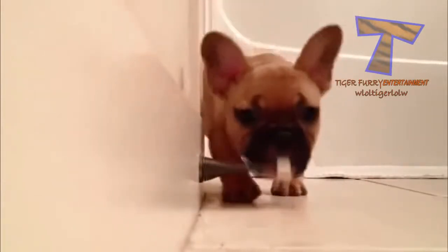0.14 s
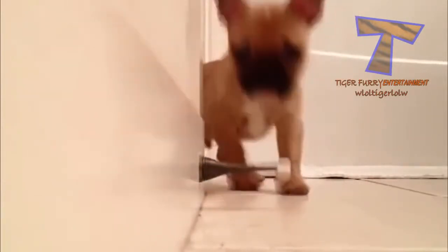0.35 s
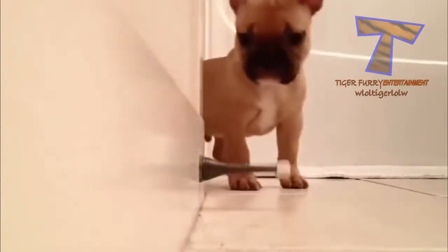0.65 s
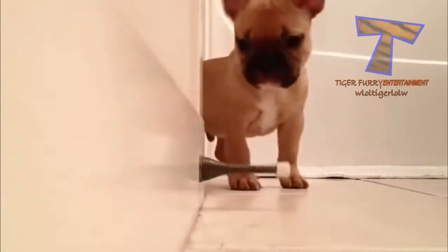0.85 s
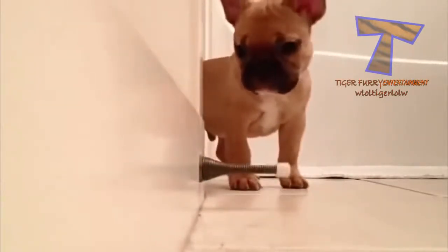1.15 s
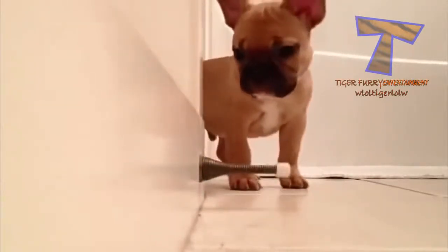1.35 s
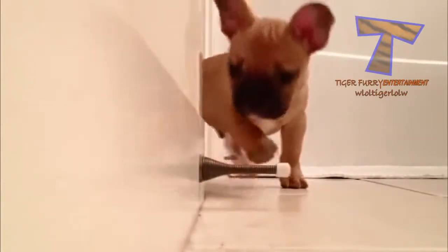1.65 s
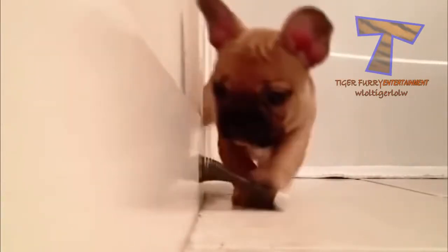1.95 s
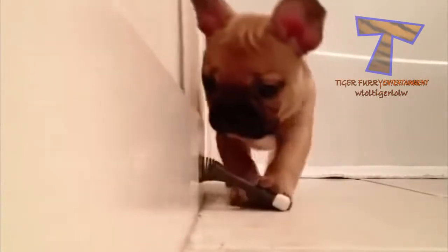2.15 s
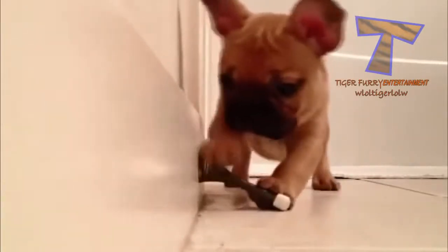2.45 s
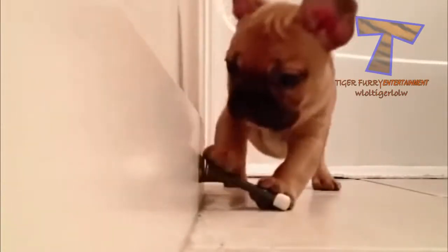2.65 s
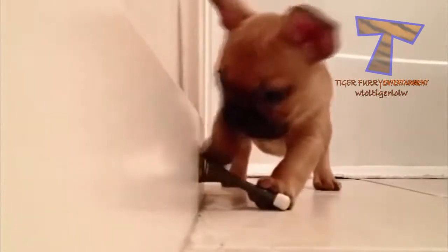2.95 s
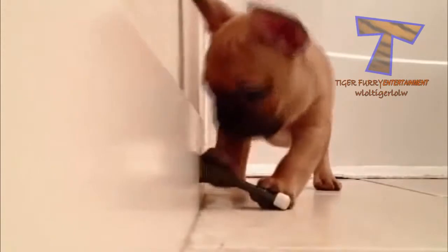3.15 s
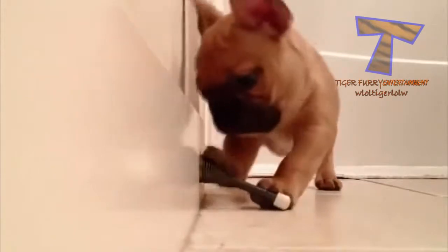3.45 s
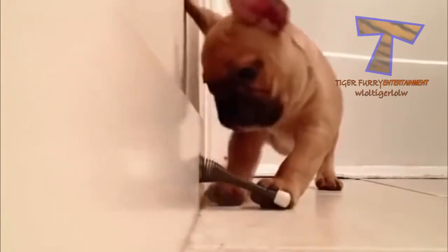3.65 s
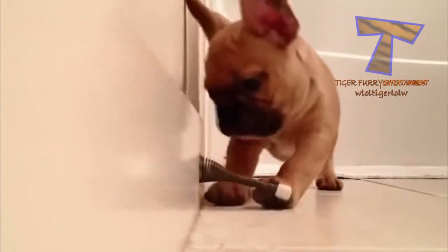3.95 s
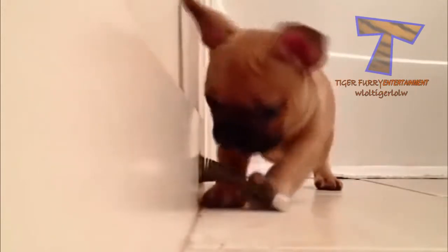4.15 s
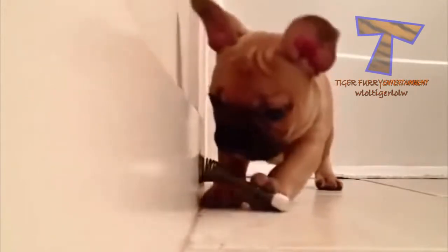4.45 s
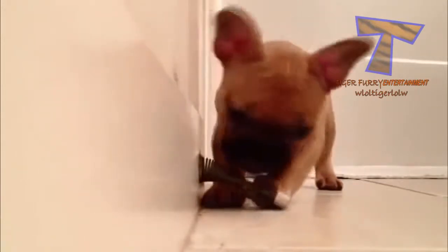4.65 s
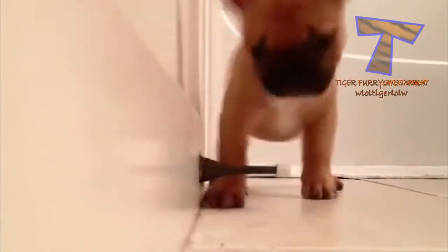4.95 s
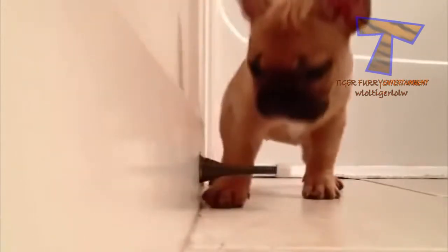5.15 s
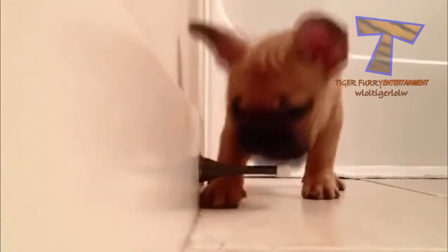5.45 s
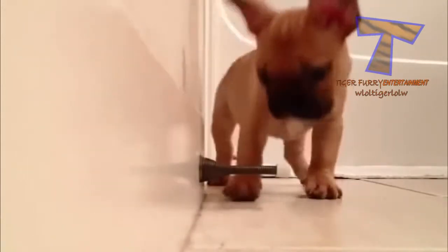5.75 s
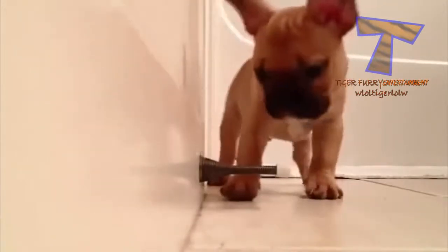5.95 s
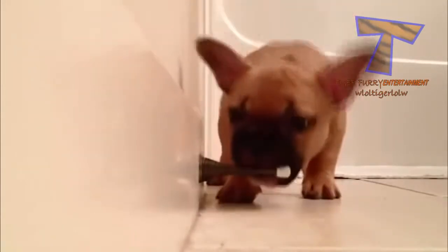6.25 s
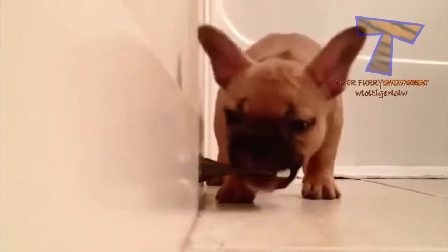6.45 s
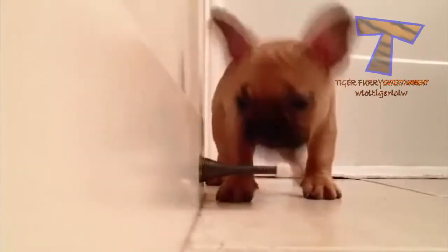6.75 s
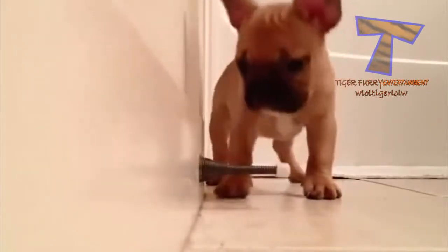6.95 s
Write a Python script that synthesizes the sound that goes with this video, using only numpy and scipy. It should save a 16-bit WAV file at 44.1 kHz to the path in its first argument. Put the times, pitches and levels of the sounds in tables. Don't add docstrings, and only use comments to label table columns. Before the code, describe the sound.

In a small tiled room with a low steady hum, a puppy sniffs and taps, then a spring door stop is let go with a loud rattling twang that flutters and fades for over a second. Soft scuffs, claw ticks and a hard knock follow, then a second, shorter twang, a few light paw thumps and a final knock. Close phone microphone, slightly overloaded.

```python
import sys
import numpy as np
from scipy import signal
from scipy.io import wavfile
from scipy.ndimage import uniform_filter1d

SR = 44100
rng = np.random.default_rng(int(sys.argv[2]) if len(sys.argv) > 2 else 0)


def persist_wave(psi):
    counts = np.round(np.clip(psi, -1, 1) * 32767).astype(np.int16)
    wavfile.write(sys.argv[1], SR, np.atleast_2d(counts).T)


def convert_level_to_amplitude(level_db):
    exponent = np.asarray(level_db, float) / 20
    return 10 ** exponent


N = 313551

# f/Hz, level/dB, width/Hz
HUM_LINES = [(120.3, -55.3, 0.5), (211.2, -57, 11), (241, -70, 2.4), (270, -66, 7.4)]
# f/Hz, density/dB per Hz
AIR_SPECTRUM = [(40, -37), (130, -14.5), (233, 4.5), (600, -20), (1460, -26), (6620, -22.5), (9600, -46),
                (15000, -33)]
AIR_DB = -56.5
# f/Hz, density/dB per Hz
SNIFF_SPECTRUM = [(2000, -27), (5000, 1), (6500, 0.5), (7600, 2.5), (9500, -4), (11700, 0.5), (14000, -5.5),
                  (15500, 0.5)]
# f/Hz, density/dB per Hz
SCUFF_SPECTRUM = [(300, -4.5), (800, -12.5), (1400, -3.5), (2200, -2.5), (3200, -10), (4300, -7),
                  (5600, -10.5), (13000, -36)]
# start/s, length/s, top level/dB, rising share of length
SNIFFS = [(-0.06, 0.2, -50, 0.4), (0.2, 0.25, -41.5, 0.65), (0.49, 0.041, -42.5, 0.71),
          (1.92, 0.09, -63, 1), (2.11, 0.29, -50.5, 0.34), (2.28, 0.26, -53, .15), (2.6, 0.23, -57, 0.29),
          (2.76, 0.14, -40.5, 0.14), (2.8, 0.28, -47.5, 0.25), (3.22, 0.33, -55, 0.18),
          (3.59, 0.23, -50.5, 0.13), (3.72, 0.18, -52.5, 0.42), (3.95, 0.25, -52, 0.18),
          (4.37, 0.18, -53.5, 0.28), (4.42, 0.29, -54.5, 0.36), (4.8, 0.085, -62, .15),
          (4.93, 0.15, -52, .5), (4.98, 0.19, -51, 0.7), (5.62, .2, -71, .5), (5.98, 0.21, -47, 0.58),
          (6.51, .16, -51.5, 0.58), (6.87, .19, -51.5, 0.44), (7.05, .12, -59, .5)]
# start/s, length/s, top level/dB, rising share of length
SCUFFS = [(-0.05, 0.19, -55, 0.3), (0.2, 0.23, -54.5, 0.75), (0.49, 0.038, -48, 0.96), (1.75, 0.27, -60, 1),
          (2.12, 0.22, -52.5, 0.38), (2.3, 0.23, -52, 0.35), (2.55, 0.19, -62, 0.96),
          (2.76, 0.42, -51, 0.088), (2.8, 0.3, -49, 0.52), (3.2, 0.31, -50, 0.26), (3.36, 0.17, -54.5, 0.7),
          (3.58, 0.21, -38, 0.36), (3.72, 0.28, -51.5, 0.18), (3.96, 0.2, -47, 0.27),
          (4.37, 0.47, -57.5, 0.22), (4.572, .13, -31, 0.03), (4.8, 0.13, -54.5, .15),
          (4.93, 0.28, -53, 0.9), (5.9, 0.1, -56, 0.27), (6.02, .16, -61, .45), (6.18, 0.093, -57, 0.12),
          (6.51, 0.27, -60, 0.4), (6.8, 0.31, -61, 0.49), (7.07, 0.055, -39, 0.17)]
SNIFF_REST_DB, SCUFF_REST_DB = -68, -66.5

# t/s, tick level/dB, scratch/ms, sharpness/dB per octave
CLAW_HITS = [(0.016, -43, 0.52, -11), (0.348, -35, 1.4, 11), (2.171, -49, 2.2, -8), (2.219, -57, .7, 0),
             (2.315, -26, 0.5, -1), (2.404, -45.5, 6.4, 11), (2.767, -41.5, 6.6, -3), (2.794, -36, 6.7, 9),
             (3.327, -47, 5, -3), (3.3632, -49, 5, -3), (3.634, -56, 3, 9), (3.6499, -22.5, 0.43, 2),
             (3.6578, -28.5, 2.3, -5), (3.7807, -43.5, 0.56, 11), (4.027, -52, 1.5, 10),
             (4.0482, -22, 0.44, 11.5), (4.054, -34.5, 6.2, 4), (4.576, -51, .7, -5),
             (4.5835, -33, 0.69, 2), (4.5965, -47, 2.7, -21), (4.989, -42, 0.74, 6), (5.128, -39, 6.2, -6),
             (5.882, -47.5, 0.73, 18), (5.9455, -49.5, 1.1, -3), (6.908, -38, 0.5, 17),
             (7.0819, -33.5, 3.8, -6)]
# t/s, knock level/dB, thump level/dB, knock f/Hz, thump f/Hz
PAD_HITS = [(0.017, -34, -27, 1170, 352), (0.045, -34.5, -27.5, 1090, 390.0), (0.347, -43, -27, 1400, 300),
            (0.517, -39, -31, 900, 623), (2.171, -43, -32, 1970, 344), (2.316, -23, -22, 1330, 544),
            (2.329, -29, -64, 2200, 530), (2.406, -41, -40, 1320, 250.0), (2.891, -33, -38, 1290, 320.0),
            (3.3274, -41, -43, 1920, 318), (3.3631, -51, -38.5, 1800.0, 300),
            (3.474, -49, -40.5, 1860, 327), (3.6594, -22.5, -29, 2880, 218), (3.7807, -42, -38, 2450, 267),
            (3.8668, -33, -35, 1400, 330.0), (4.052, -33.5, -39.5, 1510, 236),
            (4.4524, -48, -36.5, 850.0, 623), (4.469, -46, -28.5, 850.0, 437),
            (4.575, -13.5, -22, 1080, 402), (3.857, -50, -42, 1500, 330), (5.921, -53, -29, 1850, 340.0),
            (5.9258, -43, -32, 1170, 605), (5.9464, -30.5, -26, 1230, 650), (5.984, -55, -35.5, 1400, 390),
            (6.6863, -40, -29, 1400, 385), (6.689, -46, -34, 750, 604), (6.908, -38, -34.5, 1090, 416),
            (7.0837, -19, -20.5, 1350, 427), (7.092, -34.5, -24.5, 1270.0, 683)]
# t/s, level/dB, f/Hz, width/Hz
COIL_RINGS = [
    (3.659, -37, 2400, 35),
    (3.7, -40, 2300, 55),
    (2.316, -33.5, 2200, 45),
]
# f/Hz, width/Hz, level/dB
CLAW_MODES = [(4580, 600, -10), (7500, 1670, 6.5), (11500, 1300, -3), (14100, 1200, -1.5)]
# f/Hz, width/Hz, level/dB
TILE_MODES = [(850, 290, -10.5), (1400, 1700, -9), (1830, 400, -8), (2550, 430, -18.5)]
# f/Hz, width/Hz, level/dB
FLOOR_MODES = [(245, 54, -11.5), (382.5, 31, -3), (390, 16.2, 0), (570, 350, -8.5), (682, 63, -5.5),
               (1400, 22, -17)]

# t/s, rattle level/dB, board drone level/dB, panel drone level/dB
SWINGS = [
    [(0.527, -39.5, -13, -36.5), (0.901, -48.5, -26, -33.5), (1.36, -61, -37.5, -45.5),
     (1.48, -53.5, -51, -48.5), (1.55, -71, -41, -47), (1.75, -97, -65, -77)],
    [(5.134, -52, -9.5, -30.5), (5.26, -46, -19, -30.5), (5.85, -104, -63.5, -60.5)],
]
# t/s, zing level/dB, knock level/dB, thud level/dB, closing/ms
WILD_BLOWS = [(0.529, -13, -9.5, -9, 3.2), (0.5491, -31, -24, -18, 7.9), (0.569, -14, -16, -11, 2.6),
              (0.589, -29, -21, -11, 1.9), (0.6134, -26, -23, -16, 1.7), (0.6298, -37, -37, -34, 13),
              (0.6403, -9, -16, -11, 0.91), (0.6554, -24, -6, -19, 2.6), (0.673, -18.5, -40, -12, 2.8),
              (0.6946, -19, -19, -19, 1), (0.7188, -32, -14.5, -14.5, 4.9), (0.7324, -31, -42, -44, 4.8),
              (0.753, -21.5, -17.5, -19, 4.9), (0.775, -25, -15, -15.5, 4.9), (0.792, -29, -45, -24, 12),
              (5.1363, -11.5, -7.5, -12.5, 2), (5.158, -20.5, -20, -10.5, 6.6),
              (5.1965, -29, -19, -18.5, 2.4), (5.2244, -38, -18.5, -18, 2.7),
              (5.2484, -35, -17.5, -15.5, 1.2), (5.262, -27, -22.5, -23, 6.3), (5.2924, -43, -22, -17, 8.7),
              (5.3105, -44, -22, -16, 4.1)]
# t/s, zing level/dB, knock level/dB, thud level/dB
CLAPS = [(0.8115, -16, -29, -22), (0.8492, -22.5, -27, -22), (0.8854, -23, -25.5, -23),
         (0.921, -21, -26, -30), (0.9558, -21, -28, -29), (0.9909, -19.5, -25, -24),
         (1.0251, -20, -25, -30), (1.0583, -21.5, -35, -36), (1.0923, -22.5, -26, -25),
         (1.1253, -24.5, -31, -27), (1.1583, -23.5, -30, -28), (1.1905, -26, -30, -28),
         (1.2226, -29.5, -33, -39), (1.2531, -23, -36, -29), (1.284, -19, -35.5, -33),
         (1.3149, -26, -26.5, -23), (1.3433, -24.5, -29.5, -40), (1.3714, -29.5, -31, -33),
         (1.3987, -36, -41, -37), (1.4251, -32.5, -41, -36), (1.4877, -47, -46, -35),
         (1.513, -36, -37, -30), (1.5426, -34, -36.5, -37), (1.563, -44, -40.5, -35),
         (1.5888, -45, -46, -43), (1.616, -43, -51, -50), (1.6417, -42.5, -56, -55),
         (1.6674, -47, -64, -59), (1.6985, -47, -65, -56), (5.3274, -28.5, -24.5, -23),
         (5.3616, -25.5, -32, -16.5), (5.398, -45, -40, -25), (5.4261, -47, -41, -23),
         (5.4567, -59, -42.5, -24), (5.4895, -63, -52, -40), (5.5163, -64, -51, -34),
         (5.5416, -65, -59, -49), (5.5635, -66, -58, -44), (5.5934, -63, -55, -45), (5.6118, -61, -54, -54),
         (5.6418, -58, -57, -53.5), (5.6704, -59, -61, -51), (5.6994, -56, -59, -57),
         (5.7266, -55, -63, -57), (5.7626, -59, -71, -54), (5.8146, -63, -73, -53), (5.8624, -52, -71, -58)]
# t/s, zing level/dB, knock level/dB, thud level/dB
REBOUNDS = [(0.8282, -20, -29.5, -25.5), (0.8637, -22, -25, -33), (0.8987, -19, -29, -28),
            (0.9346, -15.5, -29.5, -28.5), (0.9688, -17, -28, -28.5), (1.0033, -18, -24, -25),
            (1.0373, -17.5, -25, -23), (1.0698, -20, -30, -30), (1.1041, -23, -29.5, -32),
            (1.1373, -20, -28.5, -25), (1.17, -23, -29, -33), (1.2013, -29, -33.5, -29.5),
            (1.2327, -36, -39, -28), (1.2626, -32, -39, -22.5), (1.292, -26, -32, -21),
            (1.3221, -22, -31, -26), (1.35, -25, -30, -30), (1.3775, -35, -33, -30),
            (1.4052, -27, -39, -34), (1.4396, -28, -54, -37), (1.4532, -35, -52, -43),
            (1.4664, -41, -54, -41), (1.5506, -36, -44, -36), (5.1758, -38, -26, -20)]
# t/s, zing/dB, knock/dB, thud/dB
CLAP_OFFSET = (.0004, -2.5, 7.5, -1.5)
# t/s, zing/dB, knock/dB, thud/dB
REBOUND_OFFSET = (.0007, -6.0, 8.0, 3.5)
CLAP_MS, REBOUND_MS = 3.5, 1.8
# f/Hz, width/Hz, level/dB
COIL_MODES = [(4270, 590, -4), (6940, 2050, 2.5), (7950, 1010, 3.5), (11660, 920, -8.5), (14560, 530, -10)]
# f/Hz, width/Hz, level/dB
BASE_MODES = [(900, 500, -5), (1400, 316, 2), (1876, 210, 0.5), (2365, 730, -1), (3600, 380, -12.5),
              (4390, 670, -8.5)]
# f/Hz, width/Hz, level/dB
BOARD_MODES = [(205.5, 11, -13), (241, 11, -6.5), (271.8, 11, -10.5), (330.5, 14, -2), (389.2, 8.8, -2),
               (437, 20, -4), (467, 96, -5)]
# f/Hz, width/Hz, level/dB
PANEL_MODES = [(526, 42, -6.5), (594, 11.6, -6.5), (644, 16, -7), (735, 34, -6), (760, 94, -9)]
# f/Hz, width/Hz, level/dB
PUSH_MODES = [(414, 108, 0)]
# f/Hz, width/Hz, level/dB
SLAP_MODES = [(595, 93, 0)]
GRIND_REST, GRIND_FADE_MS = 0.3, 7
TIGHTEN_DB = 4.5

# f/Hz, t60/s, level/dB
ROOM_DECAY = [(198, 0.24, -0.5), (530, 0.4, -5), (1400, 0.23, 0), (3620, 0.27, 2), (7200, 0.16, -10.5),
              (12000, 0.17, -6.5)]
PORT_DIP_HZ, PORT_DIP_WIDTH_HZ, PORT_DIP_SHARE = 5270, 1640, 0.5


def evened(x):
    return x / np.sqrt(np.mean(x ** 2) + 1e-20)


def read(points, hz, column=1):
    columns = np.transpose(points)
    return np.interp(np.log(hz + 1), np.log(columns[0] + 1), columns[column])


def noise(spectrum, patchy_db):
    hz = np.fft.rfftfreq(512, 1 / SR)
    real, imag, patches = rng.standard_normal((N // 128 + 5, 257, 3)).T
    patches = evened(uniform_filter1d(uniform_filter1d(patches, 7, 0), 16, 1))
    level_db = read(spectrum, hz)[:, None] + patchy_db * patches
    z = (real + 1j * imag) * convert_level_to_amplitude(level_db)
    return evened(signal.istft(z, nperseg=512, noverlap=384)[1][:N])


def background():
    out = convert_level_to_amplitude(AIR_DB) * noise(AIR_SPECTRUM, patchy_db=1.1)
    t = np.arange(N) / SR
    for hz, db, width_hz in HUM_LINES:
        r = np.exp(-np.pi * width_hz / SR)
        waver = signal.lfilter([1], [1, -r], rng.standard_normal((N, 2)) @ [1, 1j])
        waver = waver / np.sqrt(np.mean(abs(waver) ** 2))
        steady = 4.5 / width_hz ** 2
        line = (steady + waver) * np.exp(2j * np.pi * hz * t)
        out += convert_level_to_amplitude(db) * evened(line.real)
    return out


def strokes(rows, rest_db):
    t, db = np.arange(N) / SR, np.full(N, float(rest_db))
    for start_s, length_s, top_db, rise in rows:
        knots_s = start_s + length_s * np.array([0, np.clip(rise, 0.02, 0.98), 1])
        db = np.maximum(db, np.interp(t, knots_s, [rest_db, top_db, rest_db]))
    return uniform_filter1d(convert_level_to_amplitude(db), 200)


def fidget():
    hiss = noise(SNIFF_SPECTRUM, patchy_db=0.7)
    drag = noise(SCUFF_SPECTRUM, patchy_db=0.9)
    return strokes(SNIFFS, SNIFF_REST_DB) * hiss + strokes(SCUFFS, SCUFF_REST_DB) * drag


def body(modes, size=3500, sign=-1):
    t = np.arange(size) / SR
    ring = 0
    for k, (hz, width_hz, db) in enumerate(modes):
        decay = np.sqrt(width_hz) * np.exp(-np.pi * width_hz * t)
        ring = ring + sign ** k * convert_level_to_amplitude(db) * decay * np.sin(2 * np.pi * hz * t)
    return ring / np.linalg.norm(ring, axis=-1, keepdims=True)


def varied(modes, count):
    luck = rng.standard_normal((count, len(modes), 2, 1))
    return [(hz * (1 + 0.02 * luck[:, k, 0]), width_hz, db + 2.0 * luck[:, k, 1])
            for k, (hz, width_hz, db) in enumerate(modes)]


def strike(s, db, burst_ms, ring, grit_db, solid, soft_ms):
    t, out = np.arange(700) / SR, np.zeros(N + 6000)
    shape = (len(s), 700)
    grit = rng.standard_normal(shape) * convert_level_to_amplitude(grit_db * rng.standard_normal(shape))
    burst_s = np.reshape(burst_ms, (-1, 1)) / 1000
    burst = grit * (1 - np.exp(-t / 0.0018)) * np.exp(-2 * t / burst_s)
    burst[:, 8] += solid * np.linalg.norm(burst, axis=1)
    r = np.exp(-1000 / soft_ms / SR)
    burst = signal.lfilter([1], np.poly([r, r]), burst)
    sounds = signal.fftconvolve(burst, np.atleast_2d(ring), axes=1)
    for at_s, level_db, sound in zip(s, db, sounds):
        out[round(at_s * SR):][:len(sound)] += convert_level_to_amplitude(level_db) * sound / abs(sound).max()
    return out[:N]


def paws():
    s, knock_db, thump_db, knock_hz, thump_hz = np.transpose(PAD_HITS)
    claw_s, tick_db, scratch_ms, sharp_db = np.transpose(CLAW_HITS)
    point = [(hz, width_hz, db + sharp_db[:, None] * np.log2(hz / 8000))
             for hz, width_hz, db in varied(CLAW_MODES, len(claw_s))]
    spot = body(TILE_MODES + [(knock_hz[:, None], 4.2e5 / knock_hz[:, None], 0)], size=1200)
    ground = body(FLOOR_MODES + [(thump_hz[:, None], 70, 4)])
    tick = strike(claw_s, tick_db + 12.5, scratch_ms, body(point, size=300, sign=1),
                  grit_db=5.5, solid=0.039, soft_ms=0.0039)
    knock = strike(s, knock_db + 1.5, 1.6, spot, grit_db=1.0, solid=2.0, soft_ms=0.04)
    ring_s, ring_db, ring_hz, width_hz = np.transpose(COIL_RINGS)
    single_coil = body([(ring_hz[:, None], width_hz[:, None], 0)])
    ring = strike(ring_s, ring_db, 0.3, single_coil, grit_db=1.0, solid=4.0, soft_ms=0.01)
    thump = strike(s - 0.001, thump_db + 1.0, 0.63, ground, grit_db=2.0, solid=3.7, soft_ms=0.15)
    return tick, knock + ring, thump


def levels(tables):
    t, out = np.arange(N) / SR, 0
    for rows in tables:
        last_s, *last_db = rows[-1]
        s, *columns = np.transpose([*rows, (last_s + 0.018, *last_db)])
        out = out + np.array([convert_level_to_amplitude(np.interp(t, s, c, left=-200, right=-200)) for c in columns])
    return uniform_filter1d(out, 200, 1)


def claps():
    clap = np.column_stack([np.add(CLAPS, CLAP_OFFSET), np.full(len(CLAPS), CLAP_MS)])
    rebound = np.column_stack([np.add(REBOUNDS, REBOUND_OFFSET), np.full(len(REBOUNDS), REBOUND_MS)])
    return np.vstack([WILD_BLOWS, clap, rebound]).T


def spring():
    s, zing_db, knock_db, thud_db, closing_ms = claps()
    rattle, drone, higher = levels(SWINGS)
    at = (s * SR).astype(int)

    coils = body(varied(COIL_MODES, len(s)), size=400)
    zing = strike(s, zing_db + 4.0, closing_ms, coils, grit_db=5.5, solid=0.4, soft_ms=0.004)

    first_s, second_s = SWINGS[0][0][0], SWINGS[1][0][0]
    age_s = (s - np.where(s > second_s, second_s + 0.35, first_s))[:, None]
    tight = [(hz, width_hz, db + TIGHTEN_DB * age_s * np.log2(hz / 1500))
             for hz, width_hz, db in varied(BASE_MODES, len(s))]
    knock = strike(s, knock_db + 0.5, 1.4, body(tight, size=1200), grit_db=-3.0, solid=1.7, soft_ms=0.021)

    lift = (higher[at] / drone[at])[:, None]
    panel_blow = convert_level_to_amplitude(5.5) * body(PANEL_MODES) + convert_level_to_amplitude(-1.0) * body(SLAP_MODES)
    wood = body(PUSH_MODES) + convert_level_to_amplitude(-11.0) * body(BOARD_MODES) + lift * panel_blow
    thud = strike(s, thud_db + 1.5, 0.6, wood, grit_db=1.5, solid=4.0, soft_ms=0.08)

    grind = evened(rng.standard_normal((4, N)) * convert_level_to_amplitude(4.5 * rng.standard_normal((4, N))))
    fade = np.exp(-1000 / GRIND_FADE_MS / SR)
    shocks = signal.lfilter([1], [1, -fade], np.bincount(at, minlength=N))
    grind = grind * (GRIND_REST + 1.04 * np.minimum(shocks, 1))
    bodies = (COIL_MODES, BASE_MODES, BOARD_MODES, PANEL_MODES)
    coil, base, board, panel = (signal.oaconvolve(g, body(b))[:N] for g, b in zip(grind, bodies))
    rub = rattle * (convert_level_to_amplitude(-0.5) * coil + convert_level_to_amplitude(4) * base)
    rub = rub + drone * convert_level_to_amplitude(-8.0) * board + higher * convert_level_to_amplitude(-1.0) * panel
    return zing + knock + thud + rub


def room(x):
    taps = np.zeros((3, SR // 2))
    at = np.arange(90, SR // 2 - 20, 20) + rng.integers(0, 20, (3, (SR // 2 - 91) // 20))
    np.put_along_axis(taps, at, rng.choice([-1., 1.], at.shape), 1)
    hz, t, z = signal.stft(taps, SR, nperseg=128)
    t60_s = read(ROOM_DECAY, hz)[:, None]
    wet_db = read(ROOM_DECAY, hz, column=2)[:, None]
    z = z * convert_level_to_amplitude(wet_db - 60 * t / t60_s) / np.sqrt(t60_s)
    tails = signal.istft(z, SR, nperseg=128)[1]
    cycles = 7.3 * np.arange(N) / SR + np.arange(3)[:, None] / 3
    turns = np.sqrt(2 / 3) * np.cos(2 * np.pi * cycles)
    return signal.fftconvolve(x * turns, tails / np.linalg.norm(tails[0]), axes=1)[:, :N].sum(0)


def scene():
    bass_cut = signal.butter(4, 200, "high", fs=SR, output="sos")
    coil, ticks, feet, thumps = signal.sosfilt(bass_cut, [spring(), *paws()])
    sent = convert_level_to_amplitude(-5.5) * ticks + convert_level_to_amplitude(-5) * coil + convert_level_to_amplitude(-4.5) * feet + convert_level_to_amplitude(-4) * thumps
    mono = coil + ticks + feet + thumps + room(sent) + fidget() + background()
    return np.array([mono, mono])


def top_gate(x):
    hz, _, z = signal.stft(x, SR, nperseg=256)
    hz = hz[:, None]
    fade = convert_level_to_amplitude(-10 - (hz - 15100) / 90)
    strong = abs(z[:, 84:88]).mean((0, 1)) > convert_level_to_amplitude(-63)
    keep = np.where(hz < 15100, 1, fade * strong * (hz < 16450))
    return signal.istft(z * keep, SR, nperseg=256)[1][:, :N]


def roll_off(x):
    return signal.sosfilt(signal.butter(12, 16480, fs=SR, output="sos"), x)


def record(dry):
    cut = signal.sosfilt(signal.butter(6, 105, "high", fs=SR, output="sos"), dry)
    port = signal.iirpeak(PORT_DIP_HZ, PORT_DIP_HZ / PORT_DIP_WIDTH_HZ, SR)
    cut = cut - PORT_DIP_SHARE * signal.lfilter(*port, cut)
    loud = top_gate(0.91 * np.tanh((cut + 0.08 * cut ** 2) / 0.9))
    low_middle = signal.butter(2, [220, 560], "band", fs=SR, output="sos")
    lean = signal.sosfiltfilt(low_middle, loud) * [[1], [-1]]
    return roll_off(loud + convert_level_to_amplitude(-25) * lean)


dry = scene()
out = record(dry)
persist_wave(out)
```